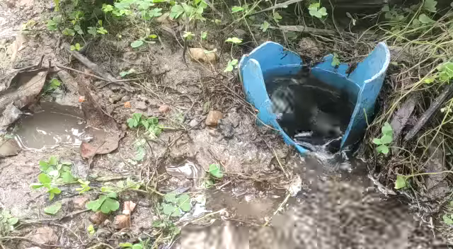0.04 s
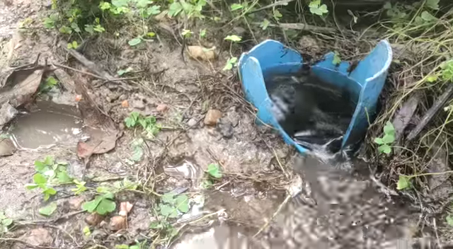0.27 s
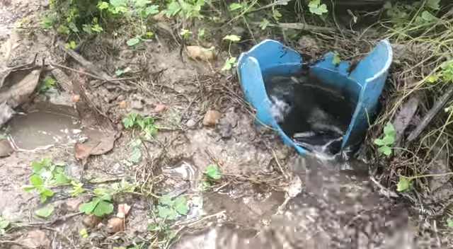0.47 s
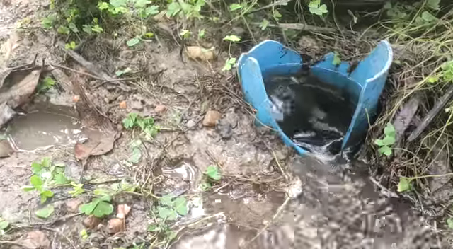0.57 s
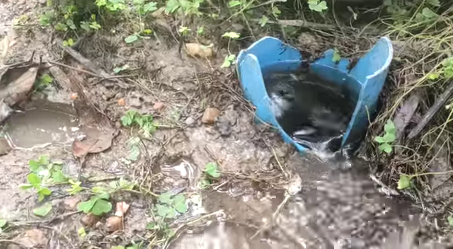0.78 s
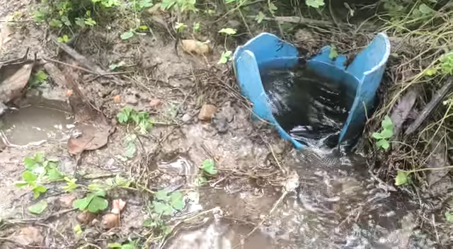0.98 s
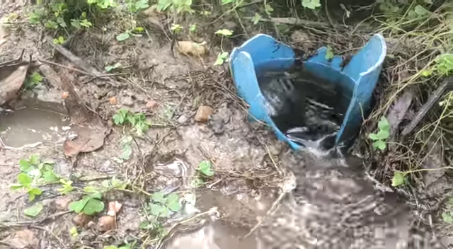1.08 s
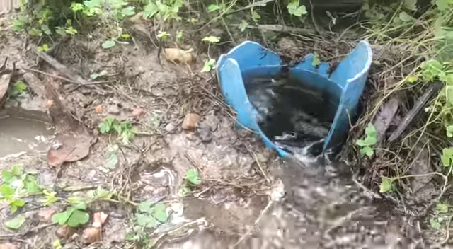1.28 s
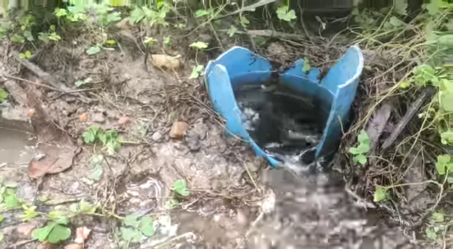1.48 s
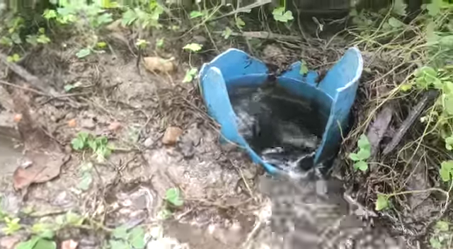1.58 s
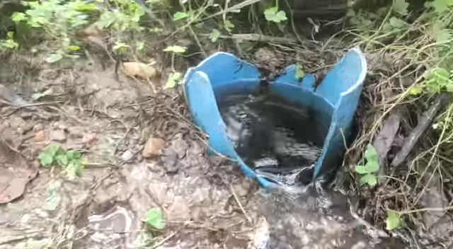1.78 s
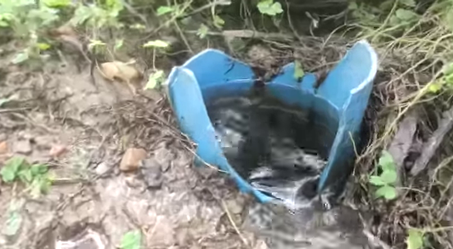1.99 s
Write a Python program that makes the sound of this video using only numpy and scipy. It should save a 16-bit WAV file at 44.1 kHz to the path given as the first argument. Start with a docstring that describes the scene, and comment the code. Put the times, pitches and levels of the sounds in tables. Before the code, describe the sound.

Water trickles softly from a broken pipe into a muddy stream, with faint crickets behind.

```python
"""A soft wash of water, with fine fizz and a few small bubbles, cuts in after a short silence:
it slides quietly out of a broken pipe into a muddy stream. Left of the microphone crickets trill
in swells, and a far bird whistles two pairs of notes among the trees. Higher insects hiss;
faint hoots and two tiny ticks come through. A low outdoor rumble lies under it all."""
import sys
import numpy as np
from scipy import signal
from scipy.fft import rfft, irfft
from scipy.io import wavfile
from scipy.ndimage import uniform_filter1d

SR = 44100
rng = np.random.default_rng(int(sys.argv[2]) if len(sys.argv) > 2 else 0)


def transcribe(signal):
    """Save signal, clipped to [-1, 1], as a 16-bit WAV file at the path in sys.argv[1]."""
    frames = np.atleast_2d(signal).T
    limited = np.clip(frames, -1, 1)
    pcm = np.round(limited * 32767).astype(np.int16)
    wavfile.write(sys.argv[1], SR, pcm)


N = 90404
T = np.arange(N) / SR
FREQS = np.arange(N // 2 + 1) * SR / N
START_S = .235

# Where the water sits in the stereo image. Each row: frequency in Hz, left minus right in dB.
WATER_BALANCE = [(600, 0.5), (1300, 3), (2300, 7), (4000, 2), (6000, 2.5), (7600, 0.5), (10000, -6),
                 (15000, -1.5)]


def stream():
    """Sliding water: a wash that flickers octave by octave, with fizz and small bubbles."""
    # Colour of the wash. Each row: frequency in Hz, relative spectral level in dB.
    colour = [(200, 1), (500, -1), (800, -2), (1300, -3.5), (2300, 2), (3700, -2), (5400, -3.5),
              (7600, -3.5), (10000, -9.5), (13000, -13), (15500, -15)]
    spectrum = wide_spectrum(colour) * pan(at(WATER_BALANCE, FREQS))
    octave = np.clip(np.log2((FREQS + 1) / 250), 0, 6)
    wash = 0
    for k in range(7):
        layer = irfft(spectrum * np.maximum(1 - abs(octave - k), 0), N)
        wash += layer * amp(.8 * walk(25.02))
    fizz = amp(-70) * bubbles(per_s=900, low_hz=1990, high_hz=10600, cycles=2.2, spread_db=3.5)
    plips = amp(-78) * bubbles(per_s=45, low_hz=600, high_hz=2420, cycles=13, spread_db=6.5)
    swell = amp(.24 * walk(3.67))
    return (amp(-58.5) * unit(wash) + fizz + plips) * swell


def bubbles(per_s, low_hz, high_hz, cycles, spread_db, rise=.11):
    """Air pockets in the water ring for a few cycles, rising in pitch."""
    out = np.zeros((2, N))
    for when, pitch, strength, place in rng.random((int(per_s * N / SR), 4)):
        hz = low_hz * (high_hz / low_hz) ** pitch
        turns = np.arange(int(2 * cycles * SR / hz) + 2) * hz / SR
        phase = 2 * np.pi * (turns + rise * turns ** 2 / cycles / 2)
        gain = amp(-spread_db * np.log(1 - .99 * strength))  # many faint, a few loud
        ring = gain * np.sin(phase) * np.exp(-np.pi * turns / cycles)
        sides = np.vstack([np.cos(np.pi * place), np.sin(np.pi * place)])
        add(out, when * N / SR, sides * pan(at(WATER_BALANCE, hz)) * ring)
    return unit(out)


def crickets(pulses_per_s=76, pulse_s=.0015, spread_hz=83):
    """Off to the left, two near crickets send trains of wing pulses; far ones blur into a band."""
    # Swells of the chorus. Each row: time in seconds, relative level in dB, pitch in Hz.
    swells = [(0.24, -65, 3110), (0.42, -58, 3000), (0.594, -67, 3000), (0.72, -61, 3100),
              (0.73, -63.5, 2990), (0.906, -60, 3030), (0.95, -67.5, 3040), (1.172, -62, 2940),
              (1.286, -70.5, 2980), (1.432, -64.5, 3030), (1.442, -59.5, 3030), (1.508, -67, 3060),
              (1.528, -60, 3070), (1.828, -64.5, 3020), (1.874, -68, 2950), (1.888, -60.5, 3020),
              (2.018, -62, 2990), (2.04, -65, 2960)]
    times, level_db, centre_hz = np.array(swells).T
    t = np.arange(int(8 * pulse_s * SR)) / SR
    pulse = (t / pulse_s) ** 2 * np.exp(-2 * t / pulse_s)
    near = np.zeros((2, N))
    for _ in range(2):
        when = 0
        for jitter, pitch, strength, left, right in rng.standard_normal((300, 5)):
            when += max(1 + .22 * jitter, .5) / pulses_per_s
            hz = np.interp(when, times, centre_hz) + spread_hz * pitch
            phase = 2 * np.pi * (hz * t + np.vstack([left, right]))
            add(near, when, amp(.5 * strength) * pulse * np.sin(phase))
    chorus = amp(-2) * unit(near) + amp(1) * band(3039, width_hz=180)
    return chorus * amp(np.interp(T, times, level_db)) * pan(8.5)


def high_insects():
    """Insects on both sides hiss in bands that slowly grow or fade, with two thin buzzes."""
    # Each row: centre in Hz, half width in Hz, midway level in dB, growth in dB per second,
    # left minus right in dB.
    hissers = [(6550, 520, -74, 4.5, 1.5), (7050, 290, -74, -2, -9), (8270, 530, -70.5, 3, -6.5),
               (3740, 41, -84.5, -16, 16)]
    # Each row: start in seconds, length in seconds, level in dB.
    buzzes = [(.945, .125, -70), (1.41, .15, -71)]
    hiss = sum(band(hz, width) * amp(db + growth * (T - T.mean())) * pan(side)
               for hz, width, db, growth, side in hissers)
    buzz_level = sum(amp(db) * note(start, length, edge_s=.03) for start, length, db in buzzes)
    return hiss + buzz_level * band(6038, width_hz=55)


def bird(pitch_hz=2242, rise_hz_per_s=200, flutter_db=1.5):
    """A far bird to the left: slightly rising, fluttering whistles with a strong octave, echoing."""
    # Each row: start in seconds, length in seconds, fundamental in dB, octave in dB, before the echo.
    whistles = [(.20, 0.089, -58, -64), (.295, .11, -69, -70), (.765, .135, -64, -63),
                (.955, .095, -58.5, -65)]
    fundamental, octave = 0, 0
    for start, length, db, octave_db in whistles:
        hz = (pitch_hz + rise_hz_per_s * (T - start)) * (1 + .005 * walk(220))
        phase = 2 * np.pi * np.cumsum(hz) / SR + rng.uniform(0, 2 * np.pi, (2, 1))
        flutter = amp(flutter_db * np.array([walk(60.6), walk(61)]))
        level = note(start, length, edge_s=.015) * flutter
        fundamental += level * amp(db) * np.sin(phase)
        octave += level * amp(octave_db) * np.sin(2 * phase)
    fundamental += amp(-4) * trees(fundamental[0])
    octave += amp(-1.5) * trees(octave[0])
    return fundamental * pan(7.5) + octave * pan(.5)


def trees(call, t60_s=2):
    """The trees scatter a call into echoes, different on each side of the microphone."""
    tail = rng.standard_normal((2, N)) * amp(-60 * T / t60_s)
    echo = signal.fftconvolve(call[None], tail, axes=1)[:, :N]
    return np.array([unit(side) for side in echo]) * np.std(call)


def hoots():
    """Soft, wavering low tones from far away."""
    # Each row: start in seconds, length in seconds, pitch in Hz, level in dB.
    calls = [(0.952, 0.084, 365, -64), (1.267, 0.089, 395, -68), (1.576, 0.21, 398, -67),
             (1.846, .14, 385, -64)]
    out = 0
    for start, length, hz, db in calls:
        phase = 2 * np.pi * np.cumsum(hz * (1 + .0243 * walk(45))) / SR
        out += amp(db) * note(start, length, edge_s=length / 2) * np.sin(phase)
    return out


def ticks(hz=14500, width_s=.00022):
    """Tiny ticks at the top of the treble, dead centre."""
    # Each row: time in seconds, peak level in dB.
    peaks = [(.937, -51), (1.765, -52)]
    return sum(amp(db) * np.exp(-((T - when) / width_s) ** 2) * np.sin(2 * np.pi * hz * (T - when))
               for when, db in peaks)


def rumble():
    """Low, gusty rumble of the open air."""
    # Colour of the rumble. Each row: frequency in Hz, relative spectral level in dB.
    colour = [(15, -6.5), (28, -2), (48, 3.5), (85, -7), (115, -5.5), (160, -16), (220, -19.5),
              (310, -29.5), (390, -24.5), (500, -34.5), (900, -63.5)]
    # Its rise and fall. Each row: time in seconds, level in dB before the gusts.
    contour = [(0.5, -53.5), (0.572, -56), (0.606, -49.5), (0.684, -48.5), (0.714, -55), (0.872, -49),
               (0.898, -51.5), (1.606, -50.5), (1.632, -55), (1.678, -50), (2.03, -51.5), (2.04, -53)]
    level_db = np.interp(T, *np.array(contour).T) - .5 * walk(8.2)
    return amp(level_db) * unit(irfft(wide_spectrum(colour), N))


def bump(rise_s=.058):
    """A soft sub-bass bump as the microphone settles when the sound cuts in."""
    age = np.maximum(T - START_S, 0) / rise_s
    return amp(-32.5) * age * np.exp(1 - age)


def wide_spectrum(colour):
    """Spectrum of a stereo noise whose bass is alike on both sides."""
    # Each row: frequency in Hz, correlation of left and right from 0 to 1.
    likeness = [(40, 0.59), (130, 0.98), (300, 0.79), (640, 0.76), (1400, 0), (4000, 0)]
    alike = np.clip(at(likeness, FREQS), 0, 1)
    mid, side = rfft(rng.standard_normal((2, N)))
    stereo = mid * np.sqrt(1 + alike) + np.array([[1], [-1]]) * side * np.sqrt(1 - alike)
    return stereo * amp(at(colour, FREQS))


def band(hz, width_hz):
    """A narrow band of noise, unrelated left and right."""
    spectrum = rfft(rng.standard_normal((2, N)))
    return unit(irfft(spectrum / (1 + ((FREQS - hz) / width_hz) ** 2 / 2) ** 2, N))


def walk(per_s):
    """Smooth random drift with rms 1."""
    hold = max(int(SR / per_s), 2)
    steps = np.repeat(rng.standard_normal(N // hold + 1), hold)
    return unit(uniform_filter1d(uniform_filter1d(steps, hold), hold)[:N])


def note(start, length, edge_s):
    """Attack, hold and release."""
    return np.clip((T - start) / edge_s, 0, 1) * np.clip((start + length - T) / edge_s + .5, 0, 1)


def add(out, start, sound):
    """Mix a short stereo sound in at a time in seconds."""
    i = int(np.clip(start * SR, 0, N - 1))
    out[:, i:i + sound.shape[1]] += sound[:, :N - i]


def at(table, hz):
    """Read a table on a log-frequency axis."""
    freqs, values = np.array(table, float).T
    return np.interp(np.log(hz + 1), np.log(freqs), values)


def pan(db):
    """Stereo gains for left minus right in dB."""
    gains = np.vstack([amp(db / 2), amp(-db / 2)])
    return gains / np.sqrt(np.mean(gains ** 2, axis=0))


def amp(db):
    """Decibels to gain."""
    return 10 ** (np.asarray(db) / 20)


def unit(x):
    """Scale to rms 1."""
    return x / np.sqrt(np.mean(x ** 2) + 1e-20)


def scene():
    """Stream, open air and animals, with the microphone's settling bump."""
    return stream() + rumble() + bump() + crickets() + high_insects() + bird() + hoots() + ticks()


def record(dry, top_hz=15600):
    """The sound cuts in abruptly and loses its very top."""
    lowpass = signal.ellip(10, .1, 70, top_hz, fs=SR, output="sos")
    return signal.sosfilt(lowpass, dry * (T >= START_S))


dry = scene()
out = record(dry)
transcribe(out)
```